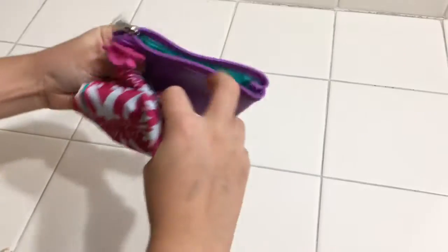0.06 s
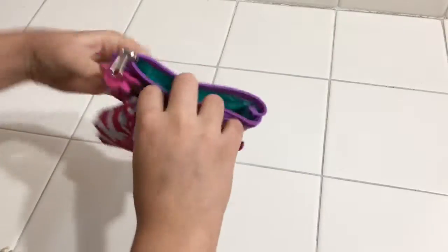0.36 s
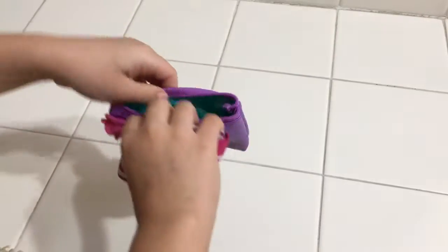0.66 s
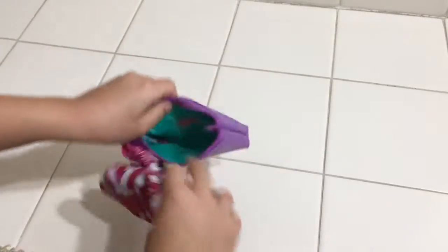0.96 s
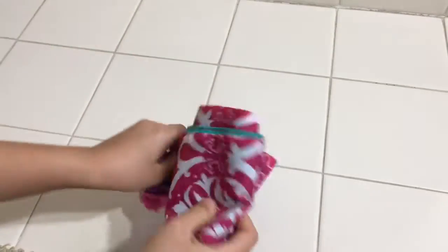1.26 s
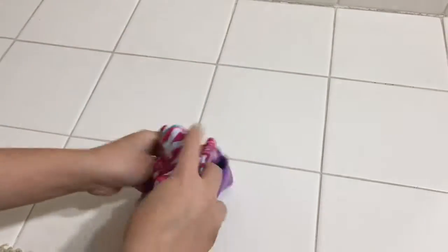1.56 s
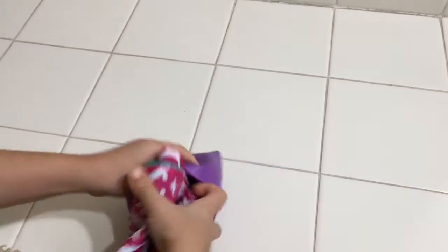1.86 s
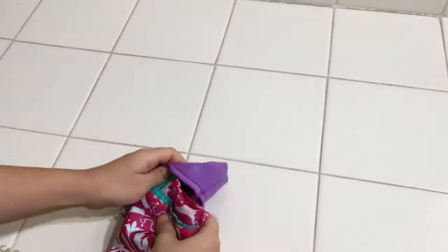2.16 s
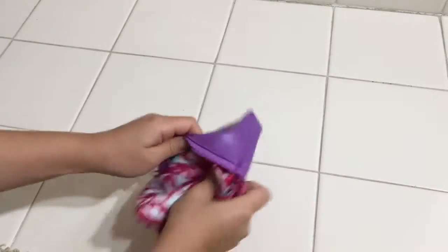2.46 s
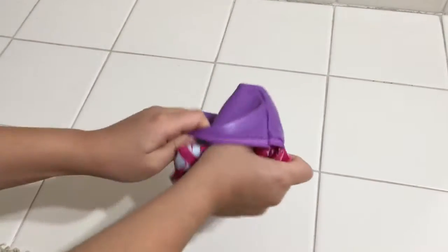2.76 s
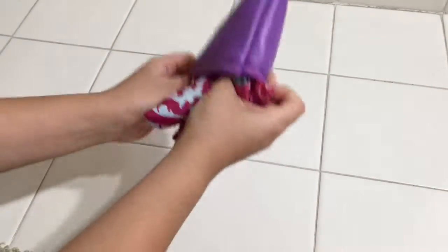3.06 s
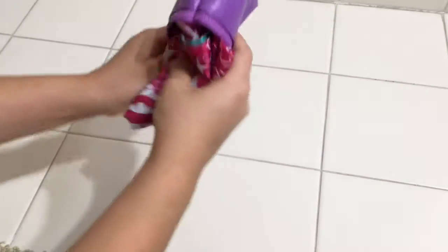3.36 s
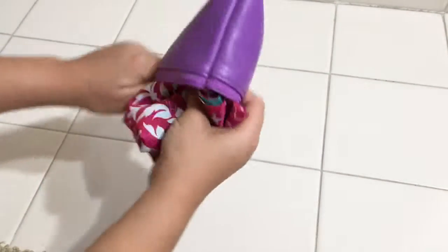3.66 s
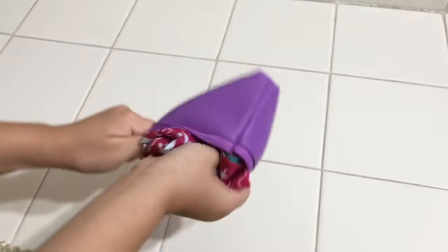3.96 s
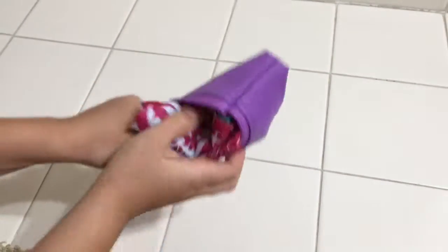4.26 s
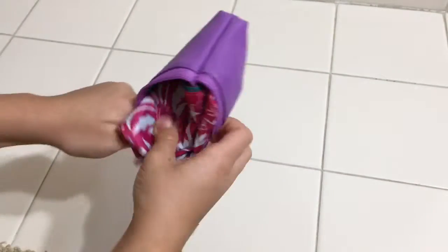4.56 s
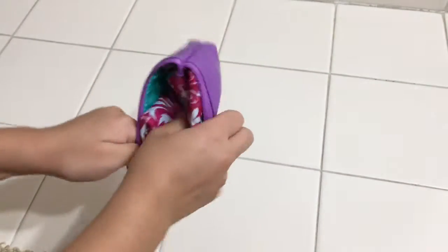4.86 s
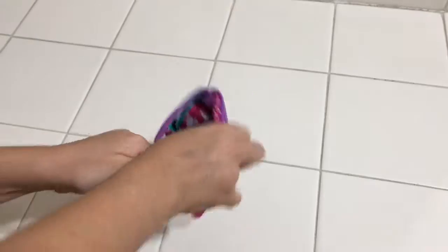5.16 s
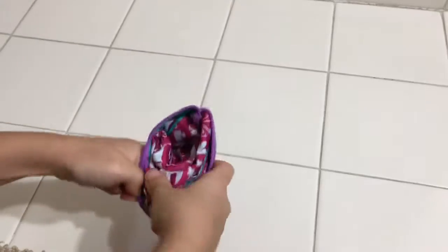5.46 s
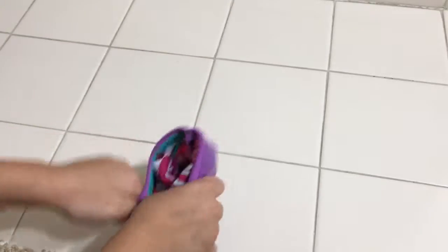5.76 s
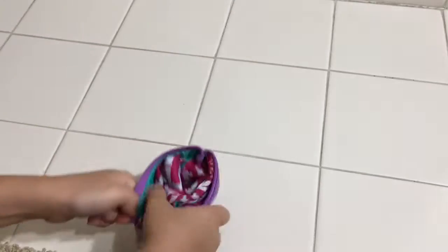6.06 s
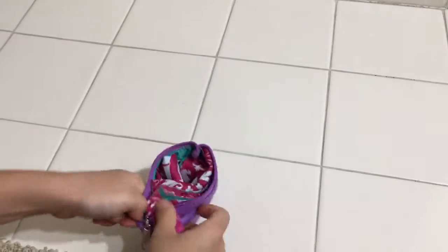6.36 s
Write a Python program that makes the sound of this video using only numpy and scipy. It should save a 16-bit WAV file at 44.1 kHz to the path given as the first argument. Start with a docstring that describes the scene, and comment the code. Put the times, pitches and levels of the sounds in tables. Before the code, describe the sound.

Two hands stuff a small cloth sleeping bag into a zippered purse, heard close up in a small tiled room with a short ring and a faint low rumble. For the first second or so the fabric rustles lightly, with little snaps of folds and faint tinkles from the metal zipper pull. From about 1.4 seconds the pushes grow firmer, with a soft thump at 1.7. The strongest rubbing and crinkling comes around 2.4 to 2.7 seconds. The pull clinks twice at about 3.1 and 3.2, followed by a quick swish. Uneven sliding strokes continue, with a dull, padded thump at 4.9 seconds. At 5.7 a sharp zipper tick lands together with a snap of cloth and a soft knock. A few more rustling pushes follow, at about 6.1 and 6.6 seconds.

```python
"""Cloth slides and crinkles in strokes as two hands stuff a small sleeping bag into a zippered purse.
Threads catch and slip, folds snap over, the metal zipper pull tinkles, the teeth tick and the purse
gives a few soft thumps. One microphone, close to the hands and above a tiled floor, feeds both channels.
Behind the handling lie the short ring and low rumble of a small room."""
import sys
import numpy as np
from scipy import signal
from scipy.fft import rfft, irfft
from scipy.io import wavfile
from scipy.ndimage import uniform_filter1d

SR = 44100
rng = np.random.default_rng(int(sys.argv[2]) if len(sys.argv) > 2 else 0)


def to_wav(s):
    """Save 16-bit WAV."""
    ch = np.atleast_2d(s).T  # columns
    pcm = np.round(np.clip(ch, -1, 1) * 32767)  # PCM
    wavfile.write(sys.argv[1], SR, pcm.astype(np.int16))


N = 291819


def amp(db):
    """Decibels to gain."""
    return 10 ** (np.asarray(db) / 20)


def unit_rms(x):
    """Scales to rms 1."""
    return x / np.sqrt(np.mean(x ** 2) + 1e-20)


def at_hz(points, hz):
    """Reads a table on a log-frequency axis."""
    f, value = np.transpose(points)
    return np.interp(np.log(hz + 1), np.log(f + 1), value)


def add(mix, start_s, sound):
    """Mixes a sound in at a time."""
    part = mix[max(round(start_s * SR), 0):][:len(sound)]
    part += sound[:len(part)]


def band(x, lo_hz, hi_hz, order=2):
    """Causal band-pass, its top held below half the sample rate."""
    edges_hz = [lo_hz, min(hi_hz, SR / 2 - 100)]
    return signal.sosfilt(signal.butter(order, edges_hz, "band", fs=SR, output="sos"), x)


def colour(x, spectrum):
    """Filters a sound by a table of gains."""
    return irfft(rfft(x) * amp(at_hz(spectrum, np.fft.rfftfreq(N, 1 / SR))), N)


def resonance(x, hz, width_hz):
    """A resonance that follows the curve hz: shift it down to zero, smooth, and shift back."""
    turn = np.exp(2j * np.pi * np.cumsum(hz) / SR)
    pole = np.exp(-np.pi * width_hz / SR)
    return 2 * (turn * signal.lfilter([1 - pole], [1, -pole], x / turn)).real


def ring(modes, t):
    """Decaying modes after one blow, which never lands twice on the same spot."""
    return sum(amp(db + 2 * rng.standard_normal() - 60 * t / t60) * np.sin(2 * np.pi * hz * t)
               for hz, db, t60 in modes)


def room_tone(rumble_db=-63.5, hum_hz=106, hum_db=-71):
    """The room behind the hands: low rumble with a wavering hum, under a faint even hiss."""
    # spectrum of the room tone: (frequency [Hz], relative level [dB])
    air_spectrum = [(20, -13), (35, -13.5), (55, -2), (80, 2.5), (115, -3), (160, -9), (220, -16.5),
                    (500, -22), (1200, -25.5), (2500, -33), (8000, -45.5), (16000, -43)]
    air = colour(rng.standard_normal(N), air_spectrum)
    hum = unit_rms(band(rng.standard_normal(N), hum_hz - 2, hum_hz + 2))
    return amp(rumble_db) * air / band(air, 30, 117, order=4).std() + amp(hum_db) * hum


def room(x, wet_db=-15, first_s=0.0032, echoes_per_s=2500, size=20000):
    """Close direct sound plus sparse reflections off tiles and walls, each band dying at its own rate."""
    # ring of the room: (frequency [Hz], t60 [s])
    decay_times = [(200, .25), (1200, .25), (5000, .18), (10000, .11)]
    taps = rng.choice([-1., 1.], size) * (rng.random(size) < echoes_per_s / SR)
    taps *= np.arange(size) > first_s * SR
    hz, t, spectra = signal.stft(taps, SR, nperseg=256)
    decay = amp(-60 * t / at_hz(decay_times, hz)[:, None])
    tail = signal.istft(spectra * decay, SR, nperseg=256)[1]
    return x + amp(wet_db) * signal.fftconvolve(x, tail / np.linalg.norm(tail))[:N]


def purse_thumps():
    """The stuffed purse is knocked and gives a dull, padded note; it is too small to radiate deep bass."""
    # soft knocks on the purse: (time [s], level [dB])
    knocks = [(1.699, -39.5), (3.234, -47.5), (4.368, -47), (4.901, -35.5), (5.711, -42.5)]
    # modes of the stuffed purse: (frequency [Hz], relative level [dB], t60 [s])
    purse_modes = [(155, -7, 0.1), (262, -7, 0.036), (363, 5, 0.025), (575, -28, 0.01), (750, 2, 0.0096)]
    out, t = np.zeros(N), np.arange(6000) / SR
    for s, db in knocks:
        add(out, s, amp(db) * ring(purse_modes, t))
    return band(out, 137, 7100, order=3)


def zipper(pull_db=-4, tick_decay_s=0.0005, size=6000):
    """The metal pull rings briefly and knocks the purse; the teeth, bound in their tape, only tick."""
    # the pull swinging against its slider: (time [s], relative level [dB])
    tinkles = [(0.0212, -49), (0.183, -49), (0.3791, -48), (0.4163, -46), (0.4386, -37.5), (0.4553, -45),
               (0.6638, -46.5), (0.679, -50), (0.796, -50), (1.43, -39.5), (1.44, -41), (3.0995, -33),
               (3.2316, -31.5), (5.3546, -45), (5.4317, -41)]
    # modes of the pull: (frequency [Hz], relative level [dB], t60 [s])
    pull_modes = [(2470, -38, 0.022), (3300, -10.5, 0.021), (9540, 0, 0.02), (9410, -6.5, 0.026),
                  (10730, -3, 0.033), (12000, -7, .025), (13400, -10, 0.016), (14780, -25, .015)]
    # hard ticks of the teeth: (time [s], peak [dB])
    ticks = [(0.456, -38), (1.497, -33), (3.069, -27.5), (4.020, -39), (5.433, -35), (5.441, -40),
             (5.7094, -15), (5.716, -25)]
    out, t = np.zeros(N), np.arange(size) / SR
    for s, db in tinkles:
        scrape = band(rng.standard_normal(size), 5600, 14600) * np.exp(-t / 0.0037)
        knock = 0.61 * unit_rms(band(rng.standard_normal(size), 700, 3200)) * np.exp(-t / 0.0027)
        cushion = 1 - np.exp(-t / 0.00039)  # the cloth around the pull softens its contact
        metal = ring(pull_modes, t * (1 + 0.019 * rng.standard_normal()))  # pitch depends on how it hangs
        add(out, s, amp(db + pull_db) * cushion * (metal + scrape + knock))
    for s, db in ticks:
        tick = band(rng.standard_normal(size) * np.exp(-t / tick_decay_s), 8500, 16500)
        add(out, s, amp(db) * tick / abs(tick).max())
    return out


def swishes(width_hz=2400):
    """A fast slide plucks the threads in turn: a fuzzy whistle whose pitch follows the hand's speed."""
    # slides across the weave: (middle [s], length [s], nominal thread crossing rate [Hz], level [dB])
    slides = [(0.683, 0.0545, 3000, -61), (1.385, 0.02, 3300, -51.5), (1.817, 0.047, 4370, -48.5),
              (3.43, 0.066, 3870, -44.5), (6.083, 0.055, 3440, -50)]
    out = np.zeros(N)
    for s, length_s, hz, db in slides:
        speed = np.hanning(round(length_s * SR))
        pitch_hz = hz * (0.82 + 0.15 * speed)
        fuzz = resonance(rng.standard_normal(len(speed)), pitch_hz, width_hz)
        whistle = resonance(fuzz, pitch_hz, width_hz)
        add(out, s - length_s / 2, amp(db) * speed * unit_rms(whistle))
    return out


def creases(hiss_gain, per_s=9, body_db=5, crack_db=1.5, spread_db=3, pitch_hz=1150, spread_octaves=0.39):
    """Small creases give way by chance, as strong as the push that causes them: rows for fold_snaps."""
    draws = rng.standard_normal((200, 3))
    times = np.cumsum(rng.exponential(1, len(draws))) / per_s
    rows = []
    for s, (body, pitch, crack) in zip(times[times < N / SR], draws):
        push_db = 20 * np.log10(hiss_gain[int(s * SR)])
        hz = pitch_hz * 2 ** (spread_octaves * pitch)
        rows.append((s, push_db + body_db + spread_db * body, hz, push_db + crack_db + spread_db * crack))
    return rows


def fold_snaps(small_creases, body_s=0.0037, crack_s=0.0026, crack_top_hz=8050, size=2048):
    """A fold flips over: a short crack, and a few damped cycles of the patch of fabric that moved."""
    # loud folds snapping against the purse: (time [s], body [dB], body pitch [Hz], crack [dB])
    folds = [(.018, -46.5, 1233, -50.5), (.0456, -42.5, 1090, -51), (.1261, -52.5, 1250, -52.5),
             (.473, -55, 1280, -58), (.801, -45, 1070, -60), (.8408, -69, 1560, -54.5),
             (.8603, -53.5, 340, -72), (.9018, -56.5, 920, -74), (.9664, -50.5, 915, -69),
             (1.0976, -43, 1040, -70), (1.1271, -44, 1070, -60), (1.3175, -48, 1000, -57),
             (1.4964, -42.5, 1720, -39.5), (1.5247, -47, 1700, -43.5), (1.5828, -40.5, 1150, -51),
             (1.6975, -37, 1190, -56), (1.7322, -40.5, 650, -48), (1.92, -38, 1900, -39),
             (2.017, -42, 626, -66), (2.1106, -39, 920, -63), (2.4462, -35.5, 1770, -38),
             (2.458, -36.5, 886, -40), (2.4853, -34.5, 1690, -35), (2.4895, -35, 640, -41),
             (2.5337, -36, 610, -50), (2.6392, -35.5, 1650, -37), (2.651, -50, 1220, -39),
             (2.6655, -34.5, 1500, -42), (2.6985, -38, 900, -36.5), (2.9826, -47, 1850, -42),
             (2.9928, -39.5, 935, -51), (3.3512, -52, 2240, -47.5), (3.531, -48, 895, -49),
             (4.0935, -43.5, 1240, -60), (4.3675, -43, 1300, -41), (4.4881, -35, 1040, -63),
             (4.8986, -35.5, 860, -42), (5.267, -45, 1780, -49), (5.457, -53, 2090, -49.5),
             (5.6041, -41.5, 1400, -53), (5.6127, -38.5, 1140, -54), (5.7093, -35.5, 1150, -38),
             (5.8436, -40.5, 543, -71), (6.0027, -48, 1020, -51), (6.3958, -50.5, 470, -59.5)]
    out, t = np.zeros(N), np.arange(size) / SR
    release = 2.8 * (t == 0)  # one kick, then the creases settle as noise
    for s, body_db, hz, crack_db in folds + small_creases:
        body_drive, crack_drive = rng.standard_normal((2, size)) + release
        flap = body_drive * np.exp(-t / body_s)
        body = band(flap, hz / 1.177, hz * 1.177) + 0.46 * band(flap, 320, 1840)
        crack = band(crack_drive * np.exp(-t / crack_s), crack_top_hz / 4.3, crack_top_hz)
        for part, db in ((body, body_db), (crack, crack_db)):
            strength = np.sqrt(np.sum(part ** 2) / (0.0024 * SR))  # rms if packed into 2.4 ms
            add(out, s, amp(db) * part / strength)
    return out


def pushes(drop_db=11, rise_power=1.62, fall_power=1.89, grip_body_db=2.5):
    """Each push speeds up and dies away over the light rubbing of the grip: hiss, body and fizz gains."""
    # pushes of the cloth, drop_db down one rise before and one fall after their fastest moment:
    # (fastest moment [s], rise [s], fall [s], hiss [dB], body offset [dB], fizz offset [dB])
    strokes = [(.022, .006, 0.097, -59, 3, 0.5), (.14, .05, 0.058, -62, 3.5, -1),
               (.265, 0.035, 0.026, -64.5, 7.5, -2.5), (.41, 0.087, 0.058, -58.5, -1, -5),
               (.56, 0.05, 0.037, -68.5, 5.5, -6), (.64, 0.043, 0.059, -60, 5.5, -4),
               (.8, 0.065, 0.047, -63, -2, -5), (1.03, 0.047, 0.052, -59.5, 0.5, 0),
               (1.12, 0.036, 0.011, -56.5, 0, -6), (1.41, 0.081, 0.14, -55.5, 3, 1.5),
               (1.57, 0.048, 0.069, -51, 3, 0), (1.705, 0.032, 0.094, -49, 0.5, -4),
               (1.9, 0.098, 0.072, -52, 0, 0), (2.03, 0.066, 0.14, -54, 4.5, -1.5),
               (2.18, .03, 0.1, -58.5, 6, -10), (2.48, 0.094, 0.086, -46.5, -2.5, 0),
               (2.55, 0.036, 0.074, -47.5, -1.5, -2), (2.655, 0.035, 0.091, -46, -2.5, -4),
               (2.86, 0.039, 0.12, -52, -12, 0.5), (2.94, 0.053, 0.097, -51.5, 2, -1),
               (3.23, .09, 0.049, -48, -1.5, 1.5), (3.43, 0.06, 0.046, -53, -5.5, -0.5),
               (3.56, 0.041, 0.15, -59.5, 3.5, -5), (3.715, 0.048, 0.016, -50.5, 0, -0.5),
               (3.85, 0.18, 0.044, -56, -0.5, -6), (3.99, 0.082, 0.034, -53.5, 2.5, -3),
               (4.25, 0.12, 0.071, -53, -7, -0.5), (4.36, 0.057, 0.024, -54, 3, 4.5),
               (4.54, 0.047, 0.064, -55.5, 3.5, 3.5), (4.63, 0.066, 0.041, -54.5, 3.5, -0.5),
               (4.749, 0.093, 0.058, -53.5, 3, 0.5), (4.88, 0.07, 0.068, -55, 2, -0.5),
               (4.99, 0.092, 0.13, -50, 1.5, -1.5), (5.26, 0.05, 0.12, -55, 3, -1.5),
               (5.43, 0.046, 0.022, -55.5, 1, -4.5), (5.56, 0.057, .1, -55.5, 0.5, -3),
               (5.7, 0.024, .02, -58.5, 2.5, 5), (5.713, 0.0044, 0.088, -45, -3.5, 3),
               (5.82, 0.054, 0.1, -53.5, 3.5, -5), (6.1, 0.059, 0.048, -49, -3, -2),
               (6.42, .05, 0.22, -62, 0, -1.5), (6.59, 0.061, 0.092, -52, -2, -2)]
    # light rubbing between pushes, stronger once the cloth is in the purse: (time [s], hiss [dB])
    grip = [(0, -75), (1.28, -76), (1.34, -65.5), (2.3, -64.5), (3.1, -64), (3.8, -60.5), (4.06, -66.5),
            (4.42, -61.5), (5.18, -74), (5.68, -61), (6.25, -71), (6.62, -65)]
    t = np.arange(N) / SR
    grip_db = np.interp(t, *np.transpose(grip))
    power = amp(grip_db + np.array([[0], [grip_body_db], [0]])) ** 2
    for s, rise_s, fall_s, db, body_db, fizz_db in strokes:
        near = slice(max(round((s - 3 * rise_s) * SR), 0), round((s + 3 * fall_s) * SR))
        since = t[near] - s
        away = np.where(since < 0, abs(since / rise_s) ** rise_power, abs(since / fall_s) ** fall_power)
        power[:, near] += amp(db - drop_db * away + np.array([[0], [body_db], [fizz_db]])) ** 2
    return np.sqrt(power)


def shifting_contact(x, depth_db):
    """The colour shifts in small patches as different folds come into contact."""
    spectra = signal.stft(x, nperseg=512, noverlap=384)[2]
    across_bands = uniform_filter1d(rng.standard_normal(spectra.shape), 7, axis=0)
    patches = unit_rms(uniform_filter1d(across_bands, 7, axis=1))
    return signal.istft(spectra * amp(depth_db * patches), nperseg=512, noverlap=384)[1][:N]


def friction(slips_per_s, spread_db, slip_share, patch_db):
    """Threads catch and slip: separate slips of uneven size over a smooth hiss of countless small ones."""
    # colour of the rubbed cloth: (frequency [Hz], relative level [dB])
    cloth_spectrum = [(150, -9.5), (340, -2.5), (440, -3.5), (560, -2), (700, -4.5), (1000, -1), (1550, -2),
                      (2100, -1), (2750, -6.5), (3600, -3), (5000, -8), (9000, -6.5), (16000, -11.5)]
    slipping = rng.random(N) < slips_per_s / SR
    sizes = amp(spread_db * np.minimum(rng.exponential(1, N), 3.5))
    slips = unit_rms(slipping * sizes * rng.choice([-1, 1], N))
    drive = np.sqrt(slip_share) * slips + np.sqrt(1 - slip_share) * rng.standard_normal(N)
    return colour(shifting_contact(drive, patch_db), cloth_spectrum)


def sliding_cloth(hiss_gain, body_gain, fizz_gain):
    """Each stroke flexes the cloth (low, coarse body) and drags it over the lining (hiss, thread fizz)."""
    # the hollow between hand and purse changes with the hold: (time [s], pitch [Hz])
    hollow = [(0, 1190), (.45, 1200), (.65, 980), (1.4, 990), (1.7, 1130), (2.7, 1260), (3.1, 850),
              (3.9, 930), (4.65, 965), (4.8, 1770), (5.05, 1660), (5.3, 1300), (6.1, 1320), (6.25, 520),
              (6.45, 520), (6.6, 1150)]
    hollow_hz = np.interp(np.arange(N) / SR, *np.transpose(hollow))
    coarse = friction(slips_per_s=380, spread_db=2.5, slip_share=0.53, patch_db=2.5)
    fine = friction(slips_per_s=700, spread_db=3.5, slip_share=0.25, patch_db=2.2)
    crinkle = band(coarse, 175, 2140, order=4)
    body = amp(-0.78) * body_gain * unit_rms(crinkle + 0.78 * resonance(crinkle, hollow_hz, width_hz=210))
    hiss = amp(-1.23) * hiss_gain * unit_rms(band(fine, 2200, 6460, order=4))
    fizz = amp(-0.6) * fizz_gain * unit_rms(band(fine, 7290, SR / 2, order=4))
    judder = unit_rms(band(rng.standard_normal(N), 20, 44.6))  # the fingers do not push evenly
    return amp(0.84 * judder) * (body + hiss + fizz)


def scene():
    """All the handling in the small room, heard by one close microphone on both channels."""
    hiss_gain, body_gain, fizz_gain = pushes()
    handling = sliding_cloth(hiss_gain, body_gain, fizz_gain) + swishes() + zipper() + purse_thumps()
    handling += fold_snaps(creases(hiss_gain))
    mono = room(handling) + room_tone()
    return np.array([mono, mono])


def record(dry):
    """The recorder's band limit cuts the top treble."""
    lowpass = signal.firwin(511, cutoff=15950, window=("kaiser", 9), fs=SR)
    return signal.oaconvolve(dry, lowpass[None], "same")


dry = scene()
out = record(dry)
to_wav(out)
```